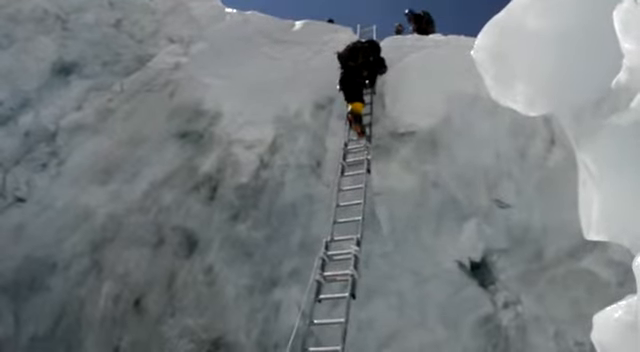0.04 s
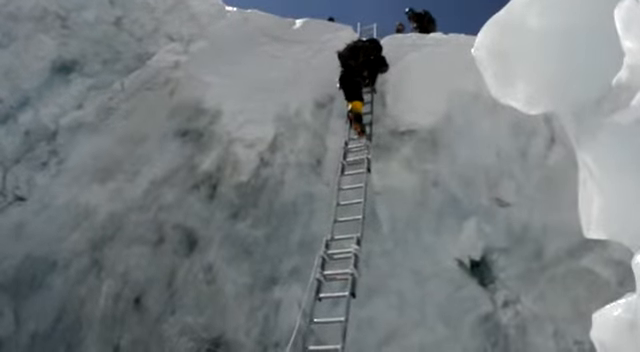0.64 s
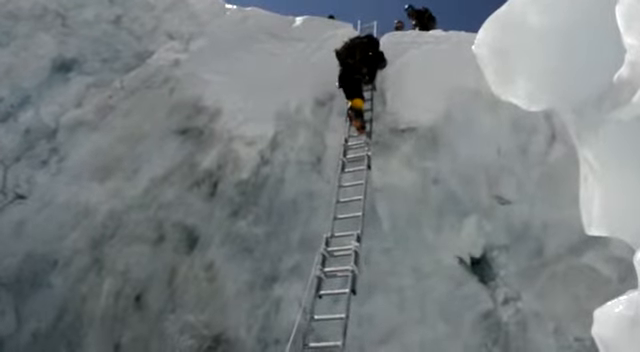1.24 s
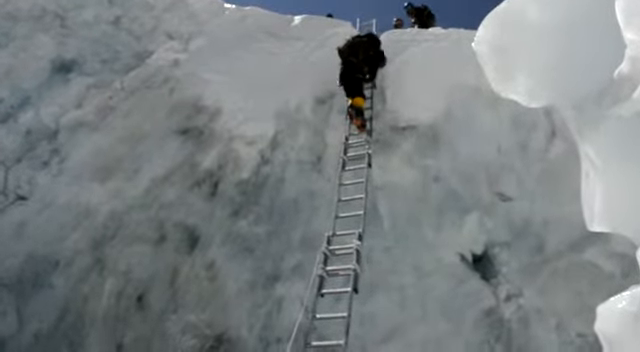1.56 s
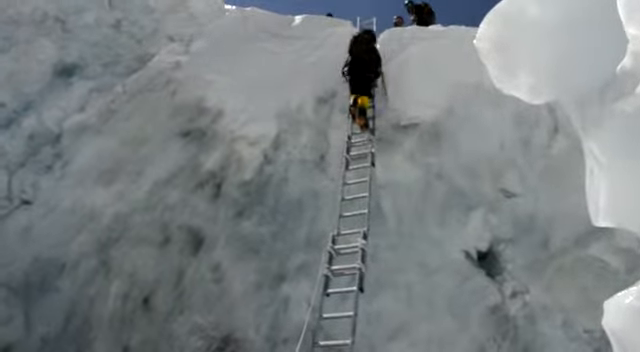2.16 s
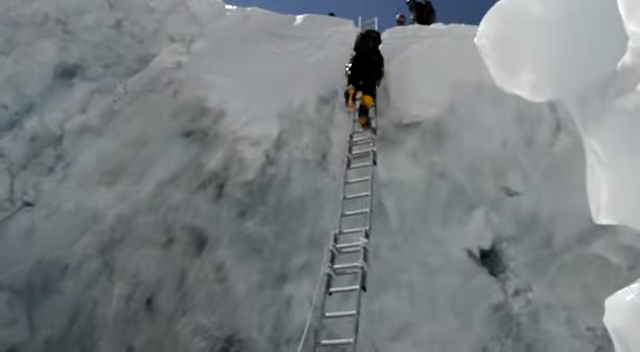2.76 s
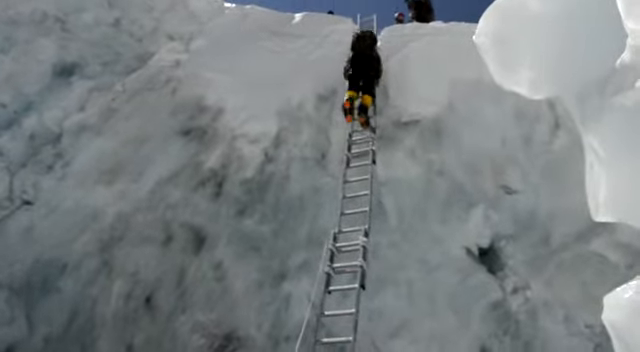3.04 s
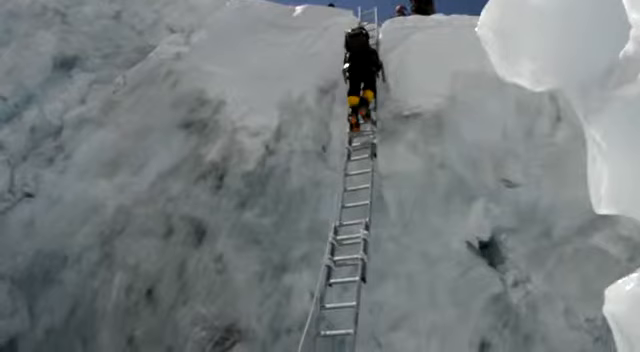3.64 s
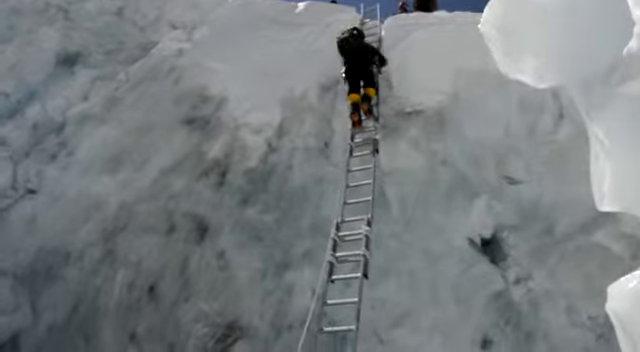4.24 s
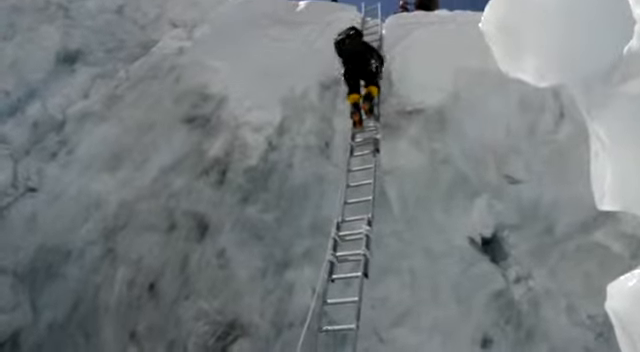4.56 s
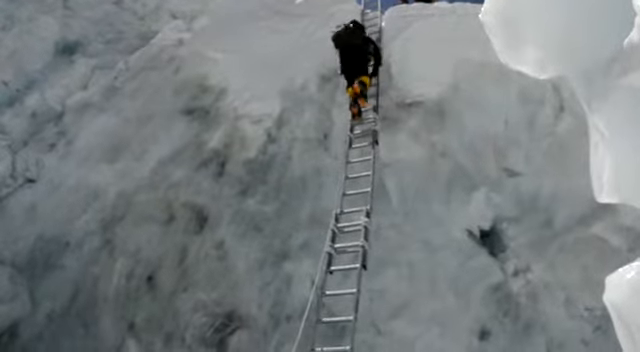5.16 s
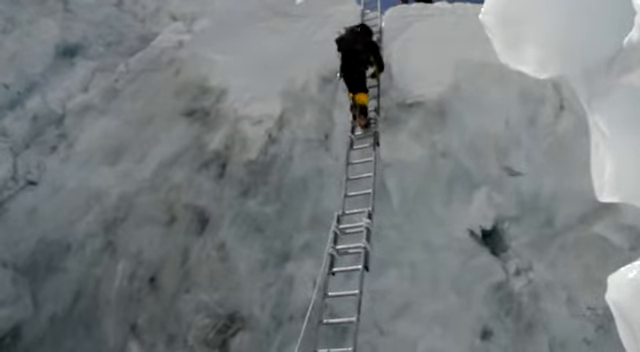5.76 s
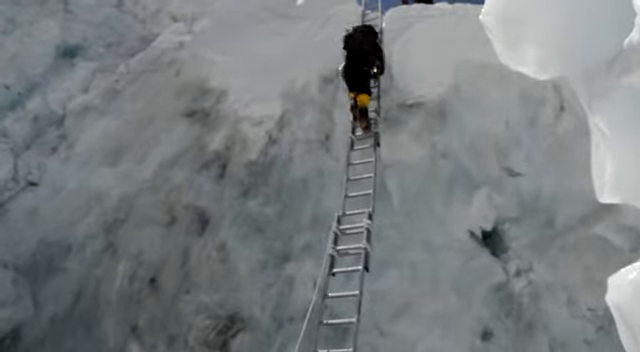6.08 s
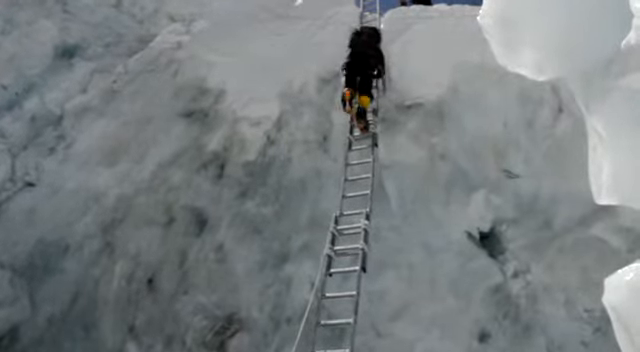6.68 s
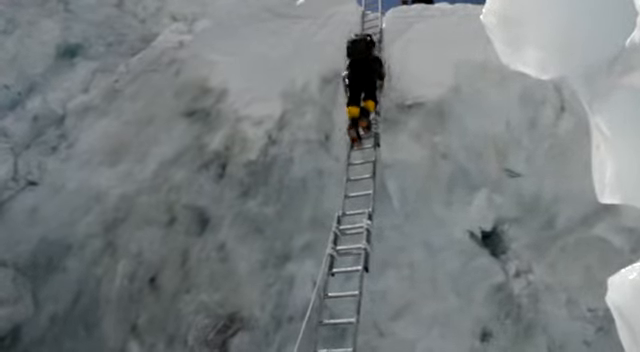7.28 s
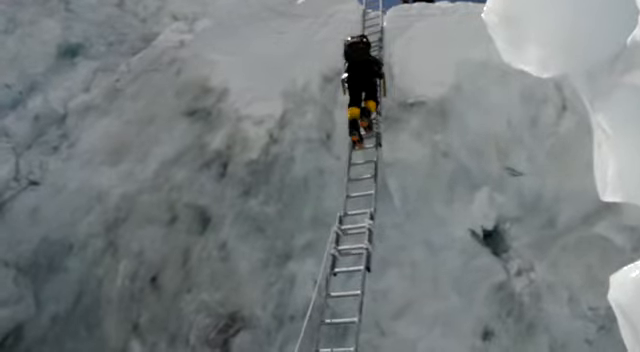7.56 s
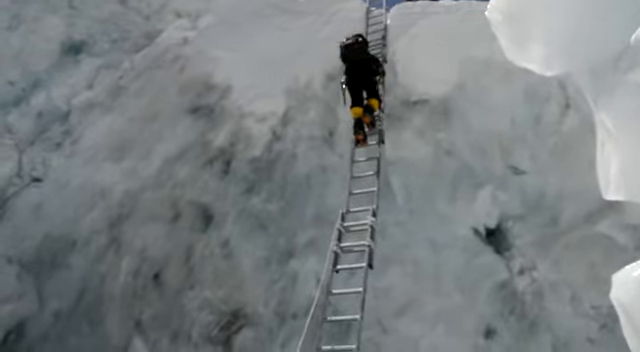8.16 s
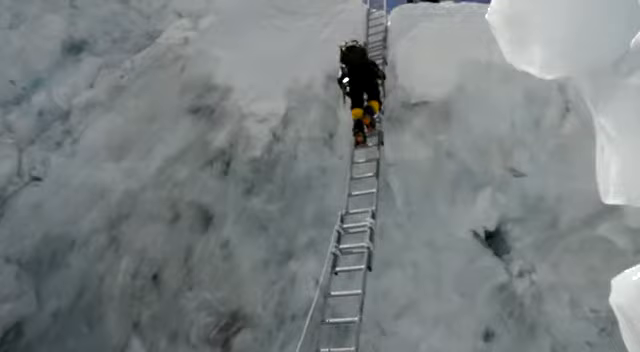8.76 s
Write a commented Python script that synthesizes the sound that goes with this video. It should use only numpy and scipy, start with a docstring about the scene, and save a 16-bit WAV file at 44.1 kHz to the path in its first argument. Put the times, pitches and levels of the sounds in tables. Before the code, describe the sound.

Steel boot spikes scuff and strike the rungs of an aluminium ladder outdoors on an icy mountain. After a small dry tick and a scrape, a thumping step lands, followed by faint rubbing and then busier clusters of bright, ringing clanks. Small clinks of gear fill the gaps, and a hard double strike comes late in the climb. Soft moving air and thin microphone hiss lie underneath.

```python
"""Sharp metal clanks and scuffs: a climber in crampons goes up an aluminium ladder on an ice wall.
Each step scrapes, strikes a rung and chatters as the spikes settle; the hollow ladder rings in its modes,
a few steps thump as the weight lands, and gear clinks in between. Faint rubbing and two dry ticks join in.
Light mountain air and a steady hiss lie underneath."""
import sys
import numpy as np
from scipy import signal
from scipy.fft import rfft, irfft, next_fast_len
from scipy.io import wavfile
from scipy.ndimage import uniform_filter1d

SR = 44100
rng = np.random.default_rng(int(sys.argv[2]) if len(sys.argv) > 2 else 0)


def generate_wav(signal):
    """Clip the signal to [-1, 1] and save it as 16-bit WAV at the path in sys.argv[1]."""
    frames = np.transpose(np.atleast_2d(signal))
    scaled = np.clip(frames, -1, 1) * 32767
    pcm = np.round(scaled).astype(np.int16)
    wavfile.write(sys.argv[1], SR, pcm)


N = 388962

# the ladder's modes, by where it is hit:
# (frequency [Hz], t60 [s], mid-rung level [dB], rung-end level [dB], side-rail level [dB])
LADDER_MODES = [(228, 0.29, -15, -7.5, -10), (368, 0.18, -12, -12, -19), (523.5, 0.57, -21.5, -18.5, -14.5),
                (633, 0.47, -17, -23, -11), (736, 0.45, -19, -39, -15), (985.5, 0.18, -11, -9.5, -12.5),
                (1297, 0.39, -10.5, -16, -29), (1483, 0.52, -21.5, -16, -9), (1633, 0.42, -25, -37, -0.5),
                (1665, 0.41, -15.5, -14, -15), (1882, 0.48, -21, -25, -8.5), (2190, 0.34, -34, -29, -8),
                (2397, 0.89, -41, -35.5, -13.5), (2570, 0.34, -31, -21, -10.5),
                (2680, 0.36, -18, -15.5, -48), (2790, 0.36, -15, -15.5, -47),
                (3013, 0.28, -8.5, -25.5, -10.5), (3650, 1, -44, -39.5, -18), (4040, 0.33, -2, -18.5, -11),
                (4250, 0.26, -9, -27.5, -24), (4330, 0.44, -14, -22, -12), (4630, 0.39, -16, -18.5, -13),
                (5010, 0.23, -14, -16, -15), (5340, 0.2, -18, -18, -7.5), (5750, 0.22, -33, -32, -4),
                (6670, 0.13, -13, -18.5, -4), (7300, 0.085, -18, -25, -2), (7940, 0.24, -22, -27.5, -24),
                (8710, 0.16, -13, -14.5, -9), (9200, 0.2, -12, -23, -17)]
# the four bands of a hit, named thud, clank, clink and spark:
# (low edge [Hz], high edge [Hz], clatter t60 [s], wash level [dB], wash t60 [s], ring level [dB])
BANDS = [(80, 450, 0.086, -4, 0.34, -11.5), (446, 2200, 0.16, 4, 0.35, 2),
         (2376, 6500, 0.12, -9.5, 0.33, -3), (6330, 14500, 0.092, -14, 0.37, -2)]


def amp(db):
    """Decibels to gain."""
    return 10 ** (np.asarray(db) / 20)


def rms(x):
    """Root mean square."""
    return np.sqrt(np.mean(x ** 2) + 1e-20)


def decay(t, t60):
    """Exponential fade, 60 dB down after t60 seconds."""
    return np.exp(-np.log(1000) * t / t60)


def eq_curve(points, hz):
    """Gain through (frequency [Hz], level [dB]) points on a log frequency axis."""
    point_hz, db = np.transpose(points)
    return amp(np.interp(np.log(hz + 1), np.log(point_hz + 1), db))


def high_pass(hz, corner_hz, order):
    """Gain of a smooth high-pass."""
    ratio = (hz / corner_hz) ** order
    return ratio / np.sqrt(1 + ratio ** 2)


def resonance(hz, centre, width):
    """A peak of gain 1, width Hz across at half height."""
    return 1 / (1 + (2 * (hz - centre) / width) ** 2)


def filtered(x, response):
    """Shape x with a gain that depends on frequency."""
    size = next_fast_len(len(x) + 4096, True)
    return irfft(rfft(x, size) * response(np.fft.rfftfreq(size, 1 / SR)), size)[:len(x)]


def noise(response, size):
    """Coloured noise of rms 1."""
    x = irfft(rfft(rng.standard_normal(size)) * response(np.fft.rfftfreq(size, 1 / SR)), size)
    return x / rms(x)


def wobble(rate, size):
    """A wandering random curve, rate knots a second."""
    knots = rng.standard_normal(int(size * rate / SR) + 4)
    return np.interp(np.arange(size) * rate / SR, np.arange(len(knots)), knots)


def add(track, time, x):
    """Mix x into the track from this time on."""
    start = round(time * SR)
    x = x[max(-start, 0):max(N - start, 0)]
    track[max(start, 0):][:len(x)] += x


def steady_noise(spectrum):
    """An even noise bed of rms 1 with this spectrum."""
    return noise(lambda hz: eq_curve(spectrum, hz), next_fast_len(N, True))[:N]


def drifting_noise(spectrum, drift_db):
    """A noise bed of rms 1 whose colour drifts in small patches of time and frequency."""
    frames = signal.stft(steady_noise(spectrum), nperseg=1024)[2]
    patches = uniform_filter1d(rng.standard_normal(frames.shape), 4, axis=0)
    patches = uniform_filter1d(patches, 9, axis=1)
    x = signal.istft(frames * amp(drift_db * patches / rms(patches)), nperseg=1024)[1][:N]
    return x / rms(x)


def microphone_hiss(level_db=-61):
    """Thin, bright hiss that differs between two microphones."""
    spectrum = [(2800, -58), (4200, -19), (6000, 7), (9500, 14.5), (12000, 3), (14300, 9.5)]  # (frequency [Hz], relative density [dB])
    return amp(level_db) * steady_noise(spectrum)


def mountain_air(low_trim_db=-0.5, rustle_trim_db=-0.53, hiss_trim_db=-4.5, flutter_db=1):
    """Low moving air and a soft rustle waver over a smooth hiss."""
    # fader moves ahead of the trims: (time [s], low air [dB], rustle [dB], hiss [dB])
    faders = [(0.0, -55.5, -53.5, -57.5), (0.76, -61, -55.5, -56.5), (1.3, -59.5, -57.5, -56.5),
              (1.47, -48.5, -47, -53.5), (1.74, -61.5, -59, -56), (2.38, -56, -55, -60),
              (2.75, -61.5, -58, -55), (3.24, -53, -50.5, -55), (3.37, -64, -45, -50),
              (3.56, -60.5, -52.5, -55), (4.2, -55.5, -54, -55.5), (4.72, -59.5, -54.5, -52),
              (4.96, -52.5, -51.5, -56), (5.23, -58, -51.5, -54.5), (5.55, -63.5, -53.5, -57.5),
              (5.82, -59, -50.5, -56), (5.99, -60, -45, -50), (6.16, -61, -52.5, -55.5),
              (6.41, -61, -59, -57), (6.66, -54.5, -52, -56), (6.93, -57, -55.5, -55),
              (7.2, -60.5, -54.5, -54.5), (7.44, -55, -53, -53), (7.76, -56.5, -54, -55),
              (8.33, -60.5, -57, -49.5), (8.82, -55.5, -54, -59.5)]
    # the colour of each layer: (frequency [Hz], relative density [dB])
    low_spectrum = [(20, -18), (60, -7.5), (150, -7), (300, -2), (450, -5.5), (800, -14.5), (2000, -41)]
    rustle_spectrum = [(200, -17), (550, 3), (1000, 4), (1700, 2), (2800, -3), (5000, -13), (10000, -61)]
    hiss_spectrum = [(1200, -27), (3500, 1), (6000, 1), (8000, -1.5), (10000, 0), (12000, -6.5),
                     (14300, -10)]
    times, *columns = np.transpose(faders)
    low_db, rustle_db, hiss_db = [np.interp(np.arange(N) / SR, times, db) for db in columns]
    low_db += low_trim_db + flutter_db * wobble(21, N)
    low = amp(low_db) * drifting_noise(low_spectrum, drift_db=1.9)
    rustle_db += rustle_trim_db + flutter_db * wobble(24, N)
    rustle = amp(rustle_db) * drifting_noise(rustle_spectrum, drift_db=2)
    hiss = amp(hiss_db + hiss_trim_db) * steady_noise(hiss_spectrum)
    return low + rustle + hiss


def rubs():
    """Narrow, fuzzy tones swell and fade as something slides."""
    # (peak time [s], half length [s], pitch [Hz], width [Hz], level [dB])
    swells = [(2.08, 0.033, 5250, 700, -57), (2.107, 0.026, 385, 52, -46.5), (2.471, 0.11, 1000, 130, -50),
              (2.89, 0.1, 2900, 200, -62), (4.18, 0.17, 2870, 185.2, -62), (4.2, .08, 6900, 648.1, -62.5),
              (4.35, 0.098, 8700, 463, -72), (4.36, 0.23, 8150, 2500, -57.5), (4.393, 0.1, 5360, 700, -59),
              (4.41, 0.13, 3870, 277.8, -59), (4.71, 0.031, 4536, 400, -53)]
    out, t = np.zeros(N), np.arange(-SR // 2, SR // 2) / SR
    for time, half_length, centre, width, db in swells:
        tone = noise(lambda hz: resonance(hz, centre, width), len(t))
        add(out, time + t[0], amp(db) * np.exp(-(t / half_length) ** 2) * tone)
    return out


def ticks(half_length_s=0.00025, tail_gain=0.13, tail_s=0.0022):
    """Small dry ticks close by: a few quick cycles and a trace of ring."""
    cues = [(.0804, 3650, -23), (4.2102, 3200, -36)]  # (time [s], pitch [Hz], level [dB])
    out, t = np.zeros(N), np.arange(-SR // 50, SR // 50) / SR
    for time, hz, db in cues:
        snap = np.exp(-(t / half_length_s) ** 2)
        tail = tail_gain * (t > 0) * np.exp(-abs(t) / tail_s)
        add(out, time + t[0], amp(db) * (snap + tail) * np.cos(2 * np.pi * hz * t))
    return out


def mode_gains(spot):
    """Strength of each mode for a blow at this spot: 0 mid-rung, 1 rung end, 2 and up side rail."""
    return amp([np.interp(spot, [0, 1, 2], levels) for _, _, *levels in LADDER_MODES])


def mode_shapes(size):
    """One resonance curve per mode, broadened by the pressing boot."""
    centres = np.array(LADDER_MODES)[:, :1]
    return resonance(np.fft.rfftfreq(size, 1 / SR), centres, width=48 + 0.0096 * centres)


def ladder_colour(shapes, spot, size, stand_out_db, scatter_db=4.0):
    """Spectrum of the rattling ladder: many weak modes, and strong ones that vary with each contact."""
    # the spread of the countless weak modes: (frequency [Hz], level [dB])
    weak_modes = [(80, -22), (140, -23.5), (220, -7), (360, -2.5), (480, -6.5), (750, 1), (1000, -1.5),
                  (1600, 0.5), (2200, -3.5), (3300, -2), (4200, -1.5), (7000, -2), (9800, 2.5), (11500, -4),
                  (14000, -24)]
    # the hollow rung, strongest when hit in the middle: (frequency [Hz], width [Hz], level [dB])
    tube_peaks = [(1009, 165, 15), (4220, 200, 8.5)]
    hz = np.fft.rfftfreq(size, 1 / SR)
    gains = mode_gains(spot) * amp(stand_out_db + scatter_db * rng.standard_normal(len(LADDER_MODES)))
    mode_power = gains ** 2 @ shapes ** 2
    tube = sum(amp(db) * resonance(hz, centre, width) for centre, width, db in tube_peaks)
    tube_power = np.clip(1 - spot, 0, 1) * tube ** 2
    return eq_curve(weak_modes, hz) * np.sqrt(1 + mode_power + tube_power)


def clatter(low_hz, high_hz, colour, size):
    """The blur of modes in one band, which overlaps softly with its neighbours."""
    def band(hz):
        low_pass = np.sqrt(abs(1 - high_pass(hz, high_hz, order=6) ** 2))
        return colour * high_pass(hz, low_hz, order=6) * low_pass
    return noise(band, size)


def ring(low_hz, high_hz, spot, t, detune=0.003, scatter_db=1.2):
    """The clear modes of one band; the shifting load and loose joints make them waver."""
    out = np.zeros(len(t))
    for (hz, t60, *_), gain in zip(LADDER_MODES, mode_gains(spot)):
        if low_hz <= hz < high_hz:
            pitch = hz * (1 + detune * rng.standard_normal())
            cycles = pitch * t + rng.random() + 0.15 * wobble(50, len(t))
            strength = gain * amp(scatter_db * rng.standard_normal())
            out += strength * decay(t, t60) * np.sin(2 * np.pi * cycles)
    return np.sqrt(2) * out


def thumps(attack_s=0.0035, bend=0.14, bend_s=0.012):
    """The boot's weight flexes the ladder: a low knock that sags in pitch as the load settles."""
    landings = [(1.288, 223, -12, 0.025), (4.82, 228, -28.5, .13), (8.173, 167, -33.5, 0.1)]  # (time [s], settled pitch [Hz], relative level [dB], t60 [s])
    out, t = np.zeros(N), np.arange(SR // 3) / SR
    for time, hz, db, t60 in landings:
        pitch = hz * (1 + bend * np.exp(-t / bend_s))
        cycles = np.cumsum(pitch) / SR + rng.random()
        envelope = (1 - np.exp(-t / attack_s)) * decay(t, t60)
        add(out, time, amp(db) * envelope * np.sin(2 * np.pi * cycles))
    return out


def grit(size, catches_per_s=230, catch_s=0.003, catch_share=0.32):
    """Friction envelope of rms 1: steady sliding plus sudden catches of uneven size."""
    impulses = (rng.random(size) < catches_per_s / SR) * rng.exponential(1, size)
    catches = signal.lfilter([1], [1, -np.exp(-1 / (catch_s * SR))], impulses)
    envelope = 1 - catch_share + catch_share * catches / rms(catches)
    return envelope / rms(envelope)


def scrapes(spot=0.64, trim_db=-3.0):
    """Sliding steel catches in quick grains that keep the ladder's modes alive."""
    # boots and spikes sliding, levels ahead of the trim:
    # (peak time [s], rise [s], fall [s], thud [dB], clank [dB], clink [dB], spark [dB])
    slides = [(0.188, 0.023, 0.044, -48.5, -36.5, -43.5, -48.5),
              (0.335, 0.025, 0.027, -51, -50, -51.5, -51.5), (0.64, 0.02, 0.03, -70, -65, -56, -57),
              (1.325, 0.014, 0.018, -68, -32, -33, -42), (1.44, 0.026, 0.059, -56, -41, -54, -60),
              (2.08, 0.12, 0.12, -68, -55, -54.5, -54.5), (2.46, 0.13, 0.076, -67, -43.5, -50, -51),
              (2.535, 0.047, 0.034, -44.5, -43.5, -48.5, -55), (3.34, 0.024, 0.024, -55, -42, -48, -63),
              (3.482, 0.02, 0.058, -48, -47, -52, -61), (3.635, 0.01, 0.034, -66, -50, -49.5, -64),
              (3.915, 0.015, 0.03, -69, -39, -42.5, -46), (4.79, 0.039, 0.029, -48, -38, -40.5, -48),
              (5.15, 0.035, 0.06, -76, -48, -51, -56.5), (5.529, 0.037, 0.03, -59, -43.5, -54, -63),
              (5.649, 0.066, 0.071, -70, -46, -41, -50), (6.48, 0.064, 0.054, -50, -42.5, -45.5, -50.5),
              (6.7, 0.017, 0.02, -64, -47, -54, -40), (7.301, 0.034, 0.09, -55, -46, -49, -55),
              (7.435, 0.022, 0.017, -33, -26, -47, -33.5), (7.96, 0.012, 0.03, -57, -43, -52.5, -58),
              (8.57, 0.066, 0.065, -51, -55, -51.5, -52)]
    out, t = np.zeros(N), np.arange(-SR // 3, SR * 2 // 3) / SR
    shapes = mode_shapes(len(t))
    for time, rise, fall, *levels in slides:
        colour = ladder_colour(shapes, spot, len(t), stand_out_db=15)
        stroke = np.exp(-np.maximum(-t / rise, t / fall)) * grit(len(t))
        for db, (low, high, *_) in zip(levels, BANDS):
            add(out, time + t[0], amp(db + trim_db) * stroke * clatter(low, high, colour, len(t)))
    return out


def strikes(graze_db=-13, graze_s=0.0021, attack_s=0.00047, crack_s=0.00043,
            chatter_db=3, chatter_per_s=330, trim_db=0.5):
    """A spike grazes, lands with a crack and chatters; the clatter dies fast, the ladder rings on."""
    # spikes and gear hitting the ladder, levels ahead of the trim: (time [s], thud [dB], clank [dB],
    # clink [dB], spark [dB], clatter length [1 = usual], spot [0 mid-rung, 1 rung end, 2 side rail])
    hits = [(0.398, -68.5, -64, -57, -43.5, 0.57, 1), (0.835, -57, -49.5, -52, -57.5, 1.5, 0),
            (0.928, -47, -39, -39, -46.5, 0.88, 0.62), (1.29, -42, -38.5, -49, -70, 0.44, 1),
            (1.33, -46, -29.5, -35.5, -40.5, 2.8, 0.78), (1.36, -61, -39, -34.5, -30, 1.4, 0.14),
            (1.384, -36, -34, -41.5, -45, 1.1, 1), (1.49, -70, -51, -49, -55, 0.27, 0.82),
            (1.527, -65, -60, -51, -75, 1, 0.35), (1.655, -54, -49, -62, -55.5, 0.58, 0),
            (1.904, -78, -47, -55, -64, 1.3, 1), (2.417, -60, -54, -50, -46.5, 0.59, 0.78),
            (2.453, -69, -67, -48, -42.5, 2, 1), (3.206, -63, -34, -30, -33, 1.5, 1.66),
            (3.224, -67, -32.5, -30, -41, 0.8, 1.7), (3.372, -59, -45.5, -39, -49, 1.2, 2.5),
            (3.727, -56, -47, -52, -53, 1, 0.83), (3.765, -45.5, -30.5, -28, -34.5, 0.61, 0.29),
            (3.811, -48, -31, -23.5, -28, 0.75, 1.24), (3.818, -44.5, -55, -48, -46, 0.64, 1.2),
            (3.892, -76, -50, -44, -37.5, 1.6, 0.75), (4.155, -51, -43, -72, -63, 1.2, 0.61),
            (4.274, -51.5, -48.5, -63, -70, 0.64, 0.26), (4.65, -70, -65, -55, -50, 1, 0),
            (4.694, -62, -68, -52, -46, 1, 0), (4.816, -41, -33, -33, -36, 1.34, 0.11),
            (5.004, -66, -42.5, -49, -63, 0.55, 2.3), (5.238, -77, -42.5, -50, -64, 1.2, 3.1),
            (5.573, -80, -47, -42.5, -36.5, 1.2, 1.6), (5.61, -77, -51, -39.5, -42, 0.68, 2.3),
            (5.633, -72, -49, -38, -45, 0.91, 2.2), (5.714, -68, -55, -41, -48, 1, 2.3),
            (5.813, -44.5, -33.5, -35, -40, 1.2, 0), (5.858, -39, -31.5, -31.5, -31, 1.35, 0.45),
            (5.952, -54, -59, -47, -45, 0.71, 1.9), (5.988, -57, -48, -47, -43.5, 0.87, 0.81),
            (6.035, -58, -49.5, -43, -38, 2.1, 1), (6.137, -65, -52, -39.5, -42, 0.5, 1),
            (6.293, -68, -52, -50.5, -81, 0.84, 0.62), (6.37, -62, -49.5, -57, -55.5, 0.4, 0.78),
            (6.49, -43, -44.5, -44, -44, 1.7, 0.68), (6.514, -40, -44, -51, -45, 0.47, 0.21),
            (6.547, -46, -24.5, -24, -22.5, 0.67, 1.7), (6.789, -67, -40.5, -42, -43.5, 1.1, 1.6),
            (6.903, -58, -58, -45.5, -37.5, 1.5, 1.7), (7.05, -75, -72, -55, -49.5, 0.8, 1),
            (7.125, -74, -42.5, -47, -54, 0.91, 1.4), (7.394, -45, -28.5, -25, -35, 0.76, 0.46),
            (7.467, -50, -43, -41, -34, 2.4, 0.57), (7.597, -52, -43, -44, -47.5, 0.89, 0.91),
            (7.922, -68, -73, -57, -46.5, 1.9, 0), (8.1163, -41.5, -27.5, -23, -31, 0.67, 0.31),
            (8.1672, -32, -22.5, -15, -14, 0.67, 0.86), (8.387, -82, -67, -57, -48, 0.74, 0.26)]
    out, t = np.zeros(N), np.arange(-SR // 100, SR * 59 // 100) / SR
    age = np.maximum(t, 0)
    graze = amp(graze_db) * np.exp(-abs(t) / graze_s)
    onset = 1 - np.exp(-age / attack_s) + graze
    crack = np.exp(-age / crack_s)
    transient = (t >= 0) & (t < 0.01)  # the first 10 ms set each band's level
    shapes = mode_shapes(len(t))
    for time, *levels, length, spot in hits:
        colour = ladder_colour(shapes, spot, len(t), stand_out_db=17)
        # tiny rebounds shake all bands at once
        contact = amp(chatter_db * wobble(chatter_per_s, len(t))) + crack
        for db, (low, high, clatter_t60, wash_db, wash_t60, ring_db) in zip(levels, BANDS):
            envelope = contact * decay(age, clatter_t60 * length) + amp(wash_db) * decay(age, wash_t60)
            rattle = envelope * clatter(low, high, colour, len(t))
            blow = onset * (rattle + amp(ring_db) * ring(low, high, spot, age))
            add(out, time + t[0], amp(db + trim_db) * blow / rms(blow[transient]))
    return out


def scene(ladder_low_cut_hz=125):
    """Everything sits dead centre; only the microphone hiss gives width."""
    steps = strikes() + scrapes() + thumps()
    # cut the deep rumble from the clanks, scrapes and thumps
    ladder = filtered(steps, lambda hz: high_pass(hz, ladder_low_cut_hz, order=2))
    mid = ladder + rubs() + ticks() + mountain_air()
    side = microphone_hiss()
    return np.array([mid + side, mid - side])


def record(dry, top_hz=14500):
    """Hard clipping at full scale, then a brick-wall cut of the top treble."""
    return np.array([filtered(channel, lambda hz: hz < top_hz) for channel in np.clip(dry, -1, 1)])


dry = scene()
out = record(dry)
generate_wav(out)
```